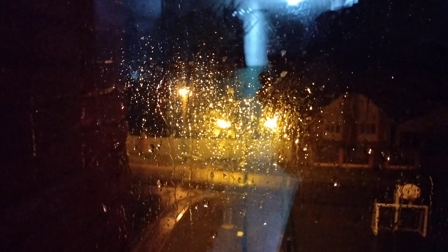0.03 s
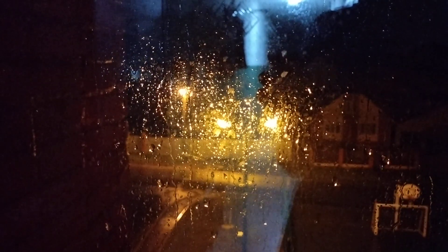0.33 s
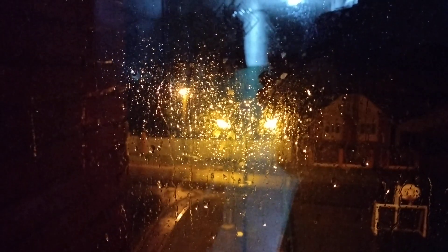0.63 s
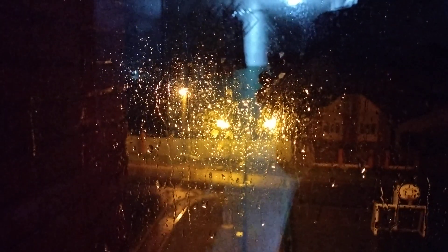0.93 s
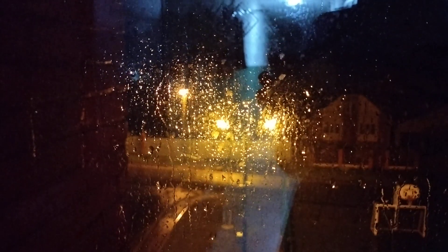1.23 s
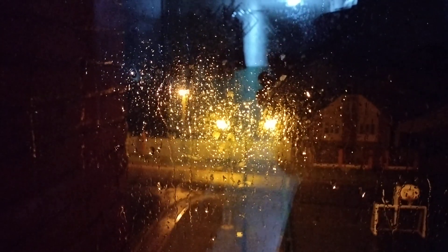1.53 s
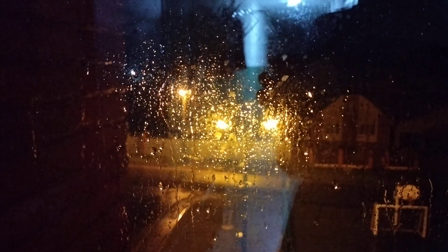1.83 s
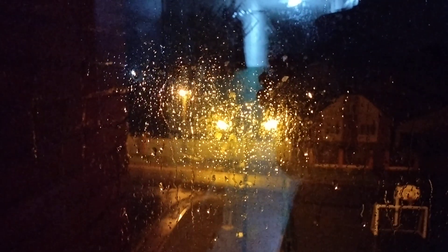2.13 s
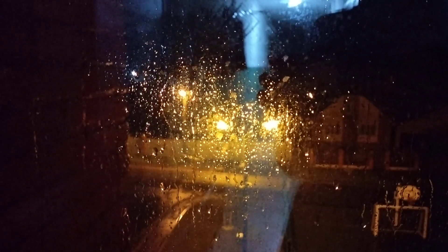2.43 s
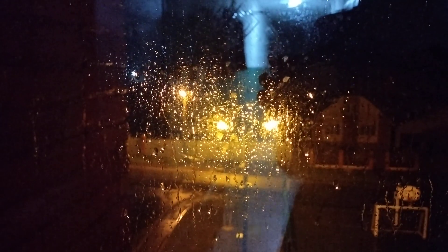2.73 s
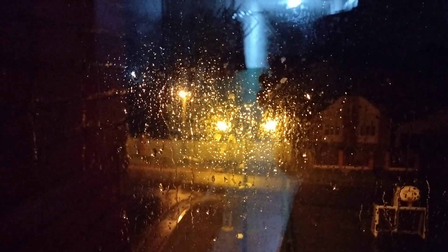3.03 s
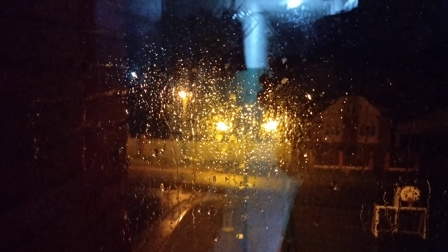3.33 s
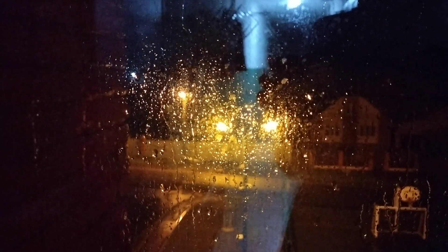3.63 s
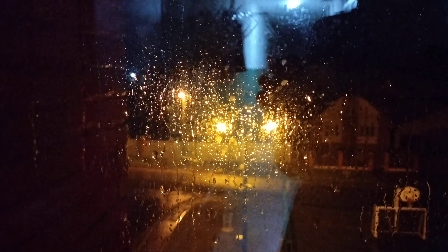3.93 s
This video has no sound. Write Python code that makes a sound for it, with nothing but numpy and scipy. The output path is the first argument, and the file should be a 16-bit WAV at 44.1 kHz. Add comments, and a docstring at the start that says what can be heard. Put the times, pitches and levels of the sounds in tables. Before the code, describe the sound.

Heavy raindrops tap irregularly on a window and its sill, each ringing briefly. Finer rain patters between them and gradually slackens. Heard from indoors at night, over faint room hiss and a soft low rumble.

```python
"""Heavy raindrops tap irregularly on a window and its sill, heard from indoors at night.
Each impact ticks and sets the panel vibrating: a dense ring, whose treble dies first, and a few
damped modes sound on in the room. Fine rain patters between the taps and slackens. Beneath lie
faint room hiss and a soft rumble from outside; a low hum swells and fades once."""
import sys
import numpy as np
from scipy.fft import rfft, irfft, next_fast_len
from scipy.io import wavfile
from scipy.ndimage import map_coordinates

SR = 44100
rng = np.random.default_rng(int(sys.argv[2]) if len(sys.argv) > 2 else 0)


def file_out(sig):
    """Save sig as 16-bit WAV at sys.argv[1]."""
    # one column per channel
    cols = np.atleast_2d(sig).T
    # limit, then scale
    lim = np.clip(cols, -1, 1)
    pcm = np.round(lim * 32767).astype(np.int16)
    wavfile.write(sys.argv[1], SR, pcm)


N = 176400

# Stereo width, side relative to mid: (frequency [Hz], level [dB])
SIDE_SPECTRUM = [(250, -11), (450, -9), (800, -3.5), (1200, 2), (2500, -0.5)]
# Spectra of the two steady noises: (frequency [Hz], relative level [dB])
HISS_SPECTRUM = [(25, -27.5), (110, -9), (220, -5), (410, -1), (600, -17), (2300, -14), (3800, -26),
                 (10000, -32), (15000, -40)]
RUMBLE_SPECTRUM = [(30, -24), (120, 10), (170, -0.5), (260, 0), (500, -41)]
# Envelope of the rumble: (time [s], level [dB])
RUMBLE_ENVELOPE = [(.2, -72), (.45, -59), (.7, -74), (1.45, -60.5), (2.1, -70.5)]
# Spectra of an impact's four registers, low to high: (frequency [Hz], relative level [dB])
THUD_SPECTRUM = [(60, -50), (130, -10), (270, -10.5), (335, -5), (420, 0), (500, -2), (600, -17),
                 (900, -44)]
KNOCK_SPECTRUM = [(350, -55), (600, -5.5), (750, -0.5), (900, -6), (1400, -17), (2400, -56)]
CLACK_SPECTRUM = [(600, -28), (1000, -3), (1900, 1), (3200, -8), (3800, -22.5), (6000, -59)]
TICK_SPECTRUM = [(2000, -26), (3600, 6), (5500, 3), (7200, 1.5), (9500, -7.5), (15000, -50)]
# Two-slope decay of the dense ring:
# (band centre [Hz], rise time [s], early T60 [s], late T60 [s], late relative level [dB])
RING_BANDS = [(150, 0.038, 0.85, 1.3, -6.5), (427, 0.0081, 0.52, 0.9, -13),
              (875, 0.0068, 0.48, 0.97, -10.5), (2200, 0.0025, 0.33, 0.87, -7.5),
              (4450, 0.0019, 0.19, 0.72, -9.5), (10600, 0.0011, 0.026, 1.04, -18.5)]
# Balance of the dense ring: (frequency [Hz], left over right [dB])
RING_BALANCE = [(150, -0.5), (330, 4.5), (550, -5), (2000, 4.5), (4000, -0.5)]
# Normal modes of the panel: (frequency [Hz], relative level [dB])
PANEL_MODES = [(339, -3), (394, -0.5), (442, -2), (490, -4), (732, -0.5), (764, 3), (880, -7.5), (1224, -9),
               (1435, -10.5)]
# Heavy impacts, with levels before the register trims:
# (time [s], clack [dB], thud [dB], knock [dB], tick [dB], pitch favoured by the landing spot [Hz])
HEAVY_DROPS = [(0.0014, -47, -42, -46.5, -71, 447), (0.0777, -39, -40, -44, -60.5, 462),
               (0.163, -67, -46.5, -48, -82, 480), (0.2147, -45, -49, -47.5, -72, 440),
               (0.2926, -42.5, -44, -45.5, -65, 400), (0.3428, -46, -46, -50, -61.5, 392),
               (0.357, -44, -51, -47, -64.5, 395), (0.4275, -40, -47.5, -46, -61, 392),
               (0.4664, -42, -45.5, -48, -64, 404), (0.6586, -42, -46.5, -45, -63.5, 462),
               (0.70, -57, -56, -48, -76, 345), (0.8843, -66, -47.5, -53, -86, 401),
               (0.9241, -50.5, -45, -46, -73, 444), (0.9571, -34, -34.5, -37, -51.5, 445),
               (1.0705, -42, -42, -44.5, -67, 411), (1.135, -46.5, -48, -44.5, -69, 441),
               (1.285, -61, -49, -58, -79, 404), (1.3344, -68, -47.5, -56.5, -90, 396),
               (1.4698, -52, -53, -62.5, -70, 382), (1.526, -53, -62, -62.5, -71, 497),
               (1.7352, -40, -45.5, -45, -57.5, 447), (1.818, -54, -46, -53.5, -85, 492),
               (1.8646, -45, -49, -53, -68, 386), (1.9129, -37.5, -42.5, -43, -63.5, 459),
               (2.12, -54, -56, -55, -82, 510), (2.168, -54, -56.5, -71, -74.5, 400),
               (2.286, -51, -58.5, -62, -68.5, 354), (2.346, -45.5, -48, -64, -65.5, 394),
               (2.4199, -60, -61, -52.5, -79, 395), (2.4612, -71, -51, -62, -89, 392),
               (2.666, -53.5, -55.5, -69, -74.5, 395), (2.6997, -61, -55.5, -60, -73, 395),
               (2.778, -57.5, -49.5, -56.5, -74.5, 409), (2.881, -49, -54, -57.5, -67.5, 383),
               (2.994, -43, -57, -60, -66.5, 397), (3.004, -41, -41.5, -41, -63, 400),
               (3.0396, -49.5, -42, -42.5, -74, 415), (3.1197, -73, -42, -49, -82, 400),
               (3.2055, -44.5, -45.5, -46.5, -65, 437), (3.3655, -55.5, -57, -65, -72, 454),
               (3.6451, -60.5, -50, -67, -81, 392), (3.70, -54.5, -62.5, -72, -73, 392),
               (3.73, -49, -68, -56, -69.5, 403), (3.765, -59.5, -59, -57.5, -78, 395)]
# Envelope of the hum: (time [s], level [dB])
HUM_ENVELOPE = [(1, -80), (1.08, -64), (1.28, -64), (1.38, -54), (1.73, -59.5), (1.98, -79.5)]

TAIL = SR * 4 // 5  # samples in one tap
ECHOES_PER_S, ECHO_FILL_S = 3500, 0.03  # initial echo density and its time to double
MODE_RISE_S, MODE_T60_S, DAMPING_EXPONENT = 0.016, 0.49, 0.34  # T60 at 400 Hz; higher modes die sooner
MODE_TRIM_DB, MODE_SPREAD_RAD, DETUNE_HZ = -2, 0.55, 7.02
FAVOUR_DB, FAVOUR_HZ = 7.5, 25.3  # lift and reach of the favoured pitch among the modes
RIPPLE_DB, RIPPLE_HZ = 6, 70  # depth and spacing of a landing spot's spectral ripple
PATTER_PER_S, PATTER_SCATTER_DB, PATTER_EASE_DB_PER_S = 14, 3.5, 3.5


def amp(db):
    """Amplitude grows tenfold for every 20 dB."""
    return 10 ** (np.asarray(db) / 20)


def unit(x):
    """Normalisation to an rms of 1."""
    return x / np.sqrt(np.mean(x ** 2) + 1e-20)


def along(points, hz):
    """Interpolation of (frequency, value) points on a logarithmic axis."""
    f, values = np.transpose(points)
    return np.interp(np.log(hz + 1), np.log(f + 1), values)


def curve(points):
    """Linear interpolation of (time, value) points at every sample."""
    return np.interp(np.arange(N) / SR, *np.transpose(points))


def wobble(rate):
    """Smooth random modulation: a spline through `rate` knots a second."""
    return map_coordinates(rng.standard_normal(int(N * rate / SR) + 4), [np.arange(N) * rate / SR])


def spread(pair, hz):
    """Mid-side mixing of two independent spectra: left and right are alike in the bass, apart above."""
    side = amp(along(SIDE_SPECTRUM, hz))
    return np.array([pair[0] + side * pair[1], pair[0] - side * pair[1]]) / np.sqrt(1 + side ** 2)


def coloured_noise(spectrum):
    """Spectral shaping of white noise, in stereo with an rms of 1."""
    hz = np.fft.rfftfreq(N, 1 / SR)
    white = spread(rfft(rng.standard_normal((2, N))), hz)
    return unit(irfft(white * amp(along(spectrum, hz)), N))


def room_hiss(level_db=-67):
    """Stationary broadband noise forms the room's floor."""
    return amp(level_db) * coloured_noise(HISS_SPECTRUM)


def outside_rumble():
    """Low-frequency noise from outside, under slow amplitude modulation."""
    return amp(curve(RUMBLE_ENVELOPE)) * coloured_noise(RUMBLE_SPECTRUM)


def dense_ring(colour, t, hz):
    """Reverberation: reflections thicken with the square of time and decay at each band's own rates."""
    density = np.clip(ECHOES_PER_S / SR * (1 + (t / ECHO_FILL_S) ** 2), 1 / SR, 1)
    echoes = rng.choice([-1, 1], (2, TAIL)) * (rng.random((2, TAIL)) < density) / np.sqrt(density)
    balance = amp(along(RING_BALANCE, hz) * np.array([[0.5], [-0.5]]))
    spectrum = spread(rfft(echoes), hz) * colour * balance
    ring = np.zeros((2, TAIL))
    for centre, rise, early_t60, late_t60, late_db in RING_BANDS:
        band = along([(f, float(f == centre)) for f, *_ in RING_BANDS], hz)
        decay = np.hypot(amp(-60 * t / early_t60), amp(late_db - 60 * t / late_t60))
        ring += irfft(spectrum * band, TAIL) * (1 - np.exp(-t / rise)) * decay
    return ring


def panel():
    """An impulse response is a dense ring plus damped normal modes. Returns the function for one tap."""
    t, hz = np.arange(TAIL) / SR, np.fft.rfftfreq(TAIL, 1 / SR)
    spectra = THUD_SPECTRUM, KNOCK_SPECTRUM, CLACK_SPECTRUM, TICK_SPECTRUM
    registers = np.array([unit(amp(along(spectrum, hz))) for spectrum in spectra])
    mode_hz, mode_db = np.transpose(PANEL_MODES)
    mode_t60 = MODE_T60_S / (mode_hz / 400) ** DAMPING_EXPONENT
    envelopes = amp(mode_db[:, None] - 60 * t / mode_t60[:, None]) * (1 - np.exp(-t / MODE_RISE_S))
    modes = envelopes * np.exp(2j * np.pi * mode_hz[:, None] * t)
    register_of_mode = registers[:, np.searchsorted(hz, mode_hz)].argmax(axis=0)
    resonant = np.minimum(1, np.minimum(hz / 1100, (3000 / (hz + 1)) ** 2))  # high splash has no pitch

    def tap(levels_db, favoured_hz):
        """The point of impact weights the resonances. Levels run thud, knock, clack, tick."""
        ripple = map_coordinates(rng.standard_normal(int(SR / 2 / RIPPLE_HZ) + 4), [hz / RIPPLE_HZ])
        spot_power = (registers * amp(RIPPLE_DB * np.minimum(ripple, 2) * resonant)) ** 2
        colour = np.sqrt(amp(levels_db) ** 2 / spot_power.mean(axis=1) @ spot_power)  # powers add
        ring = dense_ring(colour, t, hz)
        phase = 2 * np.pi * rng.random(len(modes))
        stereo_phase = phase + MODE_SPREAD_RAD * rng.standard_normal((2, len(modes)))
        favour_db = FAVOUR_DB * np.exp(-((mode_hz - favoured_hz) / FAVOUR_HZ) ** 2)
        scatter_db = 2 * rng.standard_normal(len(modes))
        gains = amp(np.take(levels_db, register_of_mode) + MODE_TRIM_DB + favour_db + scatter_db)
        detune = np.exp(2j * np.pi * DETUNE_HZ * rng.standard_normal() * t)  # one shift for all modes
        tones = ((gains * np.exp(1j * stereo_phase)) @ modes * detune).real
        release = np.minimum(1, 10 * (1 - t / t[-1]))
        return (ring + tones) * release
    return tap


def heavy_drops(tap, contact_s=0.003):
    """Impact excitation: each large drop strikes the panel contact_s before its tick peaks."""
    out = np.zeros((2, N))
    trims_db = np.array([-6, -4, -5.5, 1])
    for time_s, clack_db, thud_db, knock_db, tick_db, favoured_hz in HEAVY_DROPS:
        levels_db = trims_db + [thud_db, knock_db, clack_db, tick_db]
        add(out, tap(levels_db, favoured_hz), time_s - contact_s)
    return out


def fine_rain(tap, spot_count=8):
    """Small impacts of random size and timing excite a few spots in turn, and gradually weaken."""
    out = np.zeros((2, N))
    spots = [tap([-71, -66, -62, -71.5], mode_hz) for mode_hz, _ in PANEL_MODES[:spot_count]]
    for k, (jitter, smallness) in enumerate(rng.random((160, 2))):
        time_s = (k + 2 * jitter) / PATTER_PER_S - 0.5  # the rain is already falling
        size_db = -PATTER_SCATTER_DB * np.log(smallness + np.exp(-2))
        add(out, spots[k % spot_count] * amp(size_db - PATTER_EASE_DB_PER_S * time_s), time_s)
    return out


def add(track, sound, time_s):
    """Linear superposition of a sound on the track, starting at time_s."""
    start = round(time_s * SR)
    lo, hi = max(start, 0), min(start + sound.shape[1], N)
    if hi > lo:
        track[:, lo:hi] += sound[:, lo - start:hi - start]


def low_hum(pitch_hz=105.1, waver_hz=0.93, flicker_db=0.67):
    """A sinusoid with slight random frequency and amplitude modulation swells and fades."""
    frequency = pitch_hz + waver_hz * wobble(7.9)
    level_db = curve(HUM_ENVELOPE) + flicker_db * wobble(18)
    return np.sqrt(2) * amp(level_db) * np.sin(2 * np.pi * np.cumsum(frequency) / SR)


def scene():
    """Sound pressures add: the night's background, the rain on the panel and the hum."""
    tap = panel()
    return room_hiss() + outside_rumble() + heavy_drops(tap) + fine_rain(tap) + low_hum()


def record(dry, cutoff_hz=15300):
    """Band limiting: an ideal low-pass filter removes everything above the cutoff."""
    padded = next_fast_len(N + SR // 2)
    passband = np.fft.rfftfreq(padded, 1 / SR) < cutoff_hz
    return irfft(rfft(dry, padded) * passband, padded)[:, :N]


dry = scene()
out = record(dry)
file_out(out)
```